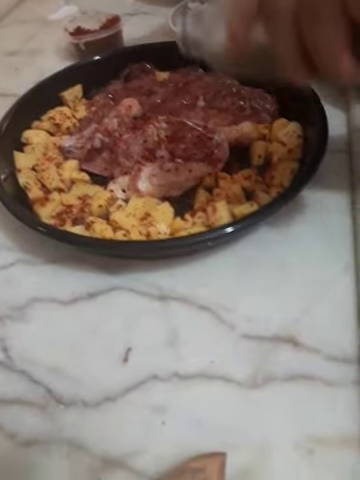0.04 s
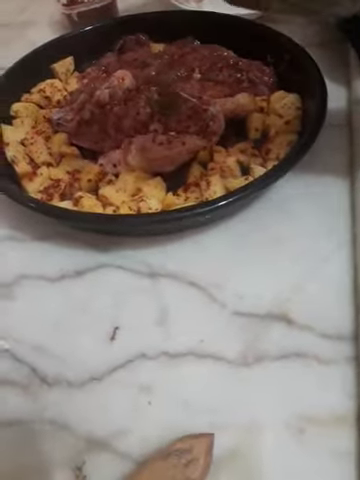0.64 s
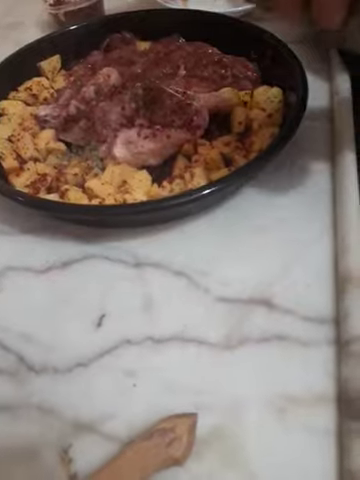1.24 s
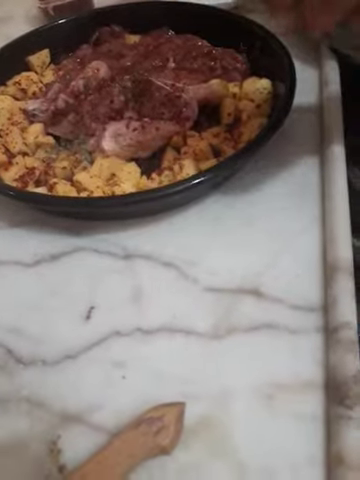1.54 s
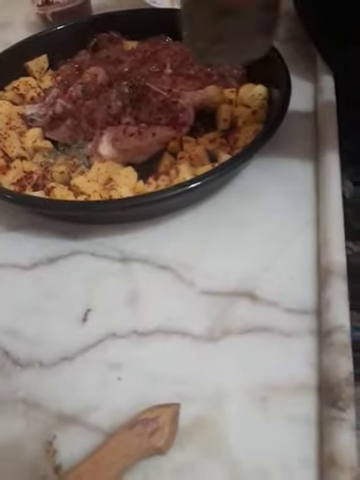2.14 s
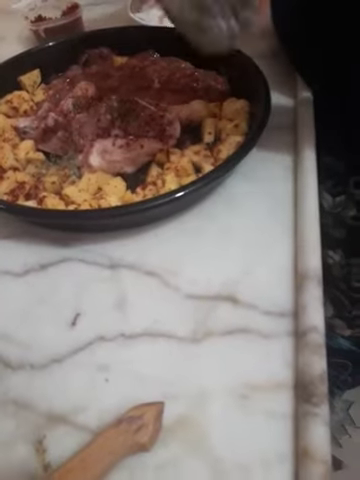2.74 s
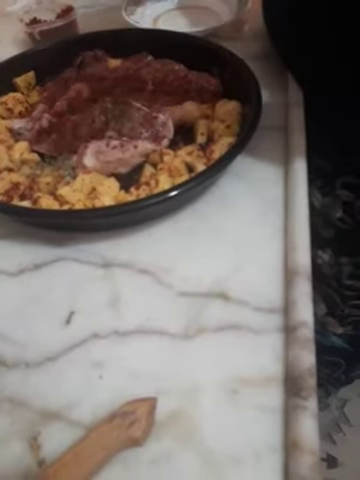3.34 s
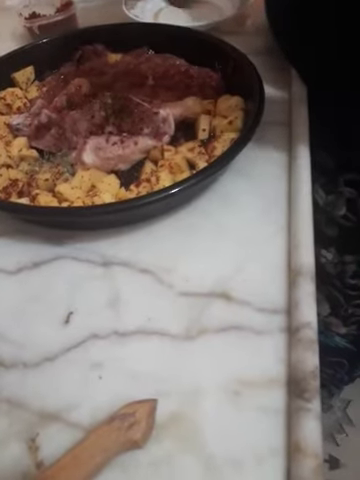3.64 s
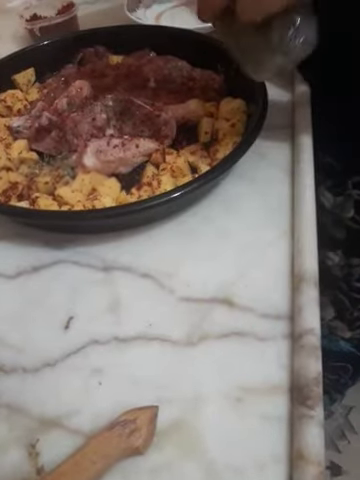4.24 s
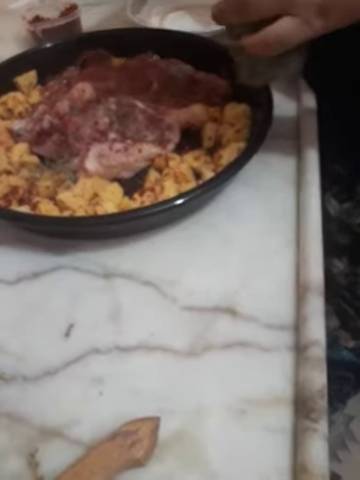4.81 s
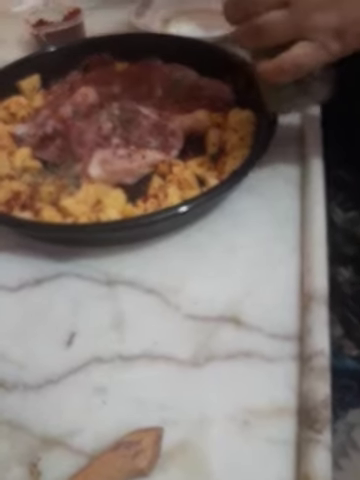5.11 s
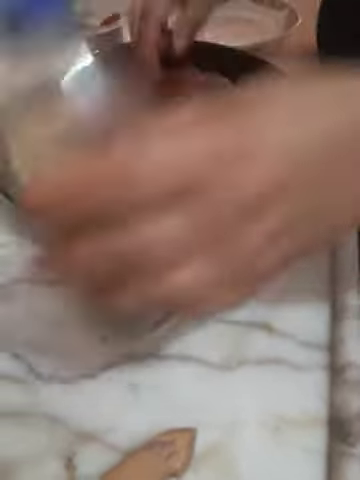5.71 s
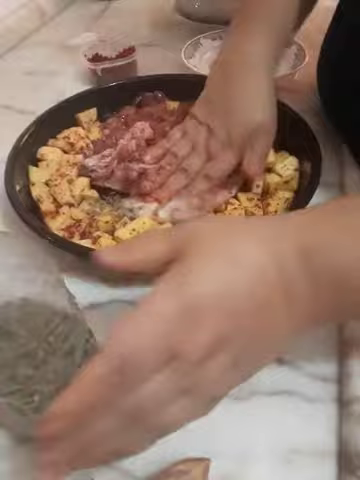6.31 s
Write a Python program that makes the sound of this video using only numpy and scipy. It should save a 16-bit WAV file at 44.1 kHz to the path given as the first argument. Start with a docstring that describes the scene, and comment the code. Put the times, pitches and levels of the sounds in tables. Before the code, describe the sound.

A small jar of dried herbs is shaken in uneven strokes, clicked shut and set down sharply on marble, over a faint fan hum.

```python
"""Dried herbs are shaken from a small jar over meat and potatoes, in a hard-walled kitchen.
For 4 s flakes rustle and hiss with each stroke and hard bits tick on the jar; a short pour follows.
From 4.7 s jar and lid click shut, then clatter on the marble top; the kitchen rings on faintly.
From 5.7 s an arm sweeps past the microphone; its draught buffets the port while a hand rubs the meat.
An appliance fan hums throughout."""
import sys
import numpy as np
from scipy import signal
from scipy.fft import rfft, irfft, next_fast_len
from scipy.io import wavfile
from scipy.ndimage import map_coordinates

SR = 44100
rng = np.random.default_rng(int(sys.argv[2]) if len(sys.argv) > 2 else 0)


def store_pcm(level_fs):
    """Save levels as 16-bit WAV."""
    pcm = np.round(np.clip(level_fs, -1, 1) * 32767).astype(np.int16)
    wavfile.write(sys.argv[1], SR, np.atleast_2d(pcm).T)


N = 284886

# jar strokes: (peak time [s], level [dB])
SHAKES = [(0.023, -37), (0.172, -35.5), (0.305, -40.5), (0.63, -58.5), (0.741, -49.5), (0.874, -47),
          (1.345, -49.5), (1.61, -49), (1.68, -39), (1.795, -39.5), (1.841, -29), (2.04, -59.5),
          (2.265, -56), (2.515, -43.5), (2.62, -46.5), (2.683, -36.5), (2.84, -49), (2.95, -49),
          (3.092, -48.5), (3.24, -39.5), (3.436, -44), (3.578, -49.5), (3.92, -42.5), (3.969, -30.5)]
# coarse flakes in the cavity: (frequency [Hz], level [dB])
RUSTLE_SPECTRUM = [(200, -24), (450, -13.5), (900, -11.5), (1650, -7.5), (2050, 2.5), (2450, 0.5),
                   (2850, -3), (3700, -1.5), (4600, -4.5), (6000, -13.5), (9000, -31)]
# fine flakes: (frequency [Hz], level [dB])
HISS_SPECTRUM = [(2500, -26), (4500, -8), (5900, 0.5), (7200, -4), (8100, -6.5), (8900, 0), (9700, -5.5),
                 (11500, -5.5), (13500, -11), (16000, -11.5)]

def shakes():
    """Strokes throw flakes along the jar, hard ones faster; coarse flakes rustle, fine ones hiss."""
    mid_db, halving_db = -40.5, 23.5  # stroke time halves per halving_db above mid_db
    mid_attack_s, mid_hold_s, mid_release_s = 0.059, 0.017, 0.06
    power = np.zeros(N)
    for peak_s, db in SHAKES:
        stretch = 2 ** ((mid_db - db) / halving_db)
        hold_s = mid_hold_s * stretch
        stroke = [(peak_s - hold_s / 2, hold_s, db)]
        power += envelope(stroke, mid_attack_s * stretch, mid_release_s * stretch) ** 2
    rustle = coloured(grains(rate_hz=5100, spread_db=3), RUSTLE_SPECTRUM)
    hiss = coloured(grains(rate_hz=15000, spread_db=1.5), HISS_SPECTRUM)
    flakes = unit_rms(clumps() * (rustle + amp(-3.5) * hiss))
    return in_kitchen(np.sqrt(power) * flakes, wet_db=-8)


def clumps(spread_db=2, rate_hz=140):
    """Fast random gain: flakes tumble in clumps."""
    knots = rng.standard_normal(N)
    return amp(spread_db * map_coordinates(knots, [np.arange(N) * rate_hz / SR], order=1))


# steady slides: (start [s], length [s], relative level [dB])
POURS = [(4.28, .17, -49), (4.335, 0.073, -44.5), (4.465, 0.14, -39)]
# flakes at the jar's mouth: (frequency [Hz], level [dB])
MOUTH_SPECTRUM = [(200, -16), (900, -11), (1500, -9), (2140, -1.5), (2720, -8), (4080, -0.5), (4780, -7.5),
                  (6240, -7), (7760, -11), (11800, -12), (16000, -20)]

def pour():
    """Flakes trickle over the tilted rim in a gritty stream."""
    stream = unit_rms(clumps() * coloured(grains(rate_hz=5000, spread_db=1), MOUTH_SPECTRUM))
    gain = amp(-2) * envelope(POURS, attack_s=0.048, release_s=0.079)
    return in_kitchen(gain * stream, wet_db=-6)


# hard bits: (time [s], level [dB], pitch [Hz], ring t60 [s])
TICKS = [(.745, -45, 3670, 0.073), (.868, -36.5, 3680, 0.029), (.891, -50, 3680, 0.048),
         (1.237, -42, 4320, .008), (1.818, -30, 3720, 0.015), (2.521, -35, 4140, 0.026),
         (2.574, -38.5, 4360, 0.018), (3.955, -31, 2950, .012), (3.975, -30, 3200, .028),
         (4.272, -50, 6110, .04), (4.335, -35, 3940, .045), (4.574, -38, 3660, 0.036)]

def ticks(snap_t60_s=0.014):
    """Hard bits strike the jar wall: a bright snap and one brief mode each."""
    t = np.arange(SR // 5) / SR
    out = np.zeros(N + SR)
    for time_s, db, hz, t60_s in TICKS:
        snap = coloured(rng.standard_normal(len(t)), HISS_SPECTRUM) * amp(-1.5 - 60 * t / snap_t60_s)
        ring = np.sin(2 * np.pi * hz * t) * amp(3 - 60 * t / t60_s)
        add(out, time_s, amp(db) * (snap + ring))
    return in_kitchen(out[:N], wet_db=-7)


# jar, lid and counter: (time [s], level [dB], cut-off [Hz], bass gain [dB], loss per rebound [dB])
KNOCKS = [(4.71, -37, 6700, 3, 25), (4.905, -38, 9100, 4, 2), (4.9112, -32, 6800, 14, 11),
          (5.0204, -28, 3800, 1.5, 23), (5.098, -11, 10600, -5, 2.5), (5.479, -22, 4000, -5, 8),
          (5.5456, -20, 5500, -15, 2.5), (5.5717, -16.5, 2560, 2.5, 14), (5.611, -28, 3480, 16, 15),
          (5.620, -18, 6260, 3.5, 6), (5.629, -20.5, 3750, 0, 25), (5.8809, -29.5, 8500, 3, 18)]

def jar_knocks(blows=3, rebound_s=0.003, cutoff_ratio=0.61, wet_db=-3, echoes=3):
    """Lid and jar click, then clatter on marble; rebounds are weaker and duller; the room answers."""
    out = np.zeros(N + SR)
    for time_s, db, cutoff_hz, bass_db, loss_db in KNOCKS:
        add(out, time_s, amp(db) * room_ring(cutoff_hz))
        for k in range(blows):
            blow_s = time_s + k * rebound_s
            gain = amp(db - k * loss_db)
            top_hz = cutoff_hz * cutoff_ratio ** k
            walls = sum(reverb(jar_blow(top_hz, bass_db)) for _ in range(echoes)) / np.sqrt(echoes)
            add(out, blow_s, gain * jar_blow(top_hz, bass_db))
            add(out, blow_s, gain * amp(wet_db) * walls)
    return out[:N]


# jar and lid: (frequency [Hz], level [dB], t60 [s])
JAR_MODES = [(456, -13, 0.11), (800, -11.5, 0.049), (1128, -2.5, 0.057), (1310, -14, 0.0286),
             (1500, -9, 0.032), (1550, -6, 0.013), (2110, -0.5, 0.069), (2400, 1, 0.018), (3050, 1, 0.024),
             (3790, -2, 0.038), (4720, -0.5, 0.022), (5200, -7, 0.023), (7400, -21, 0.013),
             (8400, -8, 0.011), (10200, -3, 0.01)]
# contact noise: (frequency [Hz], level [dB])
CRACK_SPECTRUM = [(50, -50), (140, -34), (280, -18), (480, -1.5), (750, -5), (1200, -2), (2200, 3),
                  (2900, -6.5), (4200, -0.5), (5200, -6.5), (6500, -7), (8600, -8.5), (11000, -9),
                  (16000, -20)]

def jar_blow(cutoff_hz, bass_db, crack_t60_s=0.025, rise_s=0.0002):
    """A short crack plus damped modes; a soft touch loses treble, a heavy one gains bass."""
    def touch(hz):
        lowpass = 1 / (1 + (hz / cutoff_hz) ** 8)
        treble_floor = min(cutoff_hz / 15000, 1) ** 2
        bass_shelf = amp(bass_db / (1 + (hz / 1100) ** 2))
        return np.hypot(lowpass, treble_floor) * bass_shelf

    t = np.arange(SR // 16) / SR
    ring = np.zeros(len(t))
    for hz, db, t60_s in JAR_MODES:
        pitch_hz = hz * rng.normal(1, 0.013)  # grip detunes each blow
        decay = amp(db + rng.normal(0, 1.46) - 60 * t / t60_s)
        ring += touch(hz) * decay * np.sin(2 * np.pi * (pitch_hz * t + rng.random()))
    noise = coloured(rng.standard_normal(len(t)), CRACK_SPECTRUM)
    crack = filtered(noise, touch) * amp(-60 * t / crack_t60_s)
    blow = (amp(-12.5) * ring + crack) * (1 - np.exp(-t / rise_s))
    highpass = signal.butter(2, 200, 'high', fs=SR, output='sos')  # a small jar radiates no deep bass
    blow = signal.sosfilt(highpass, blow)
    return blow / np.sqrt(np.mean(blow[:SR // 250] ** 2))  # rms 1 over the first 4 ms


# kitchen resonances: (frequency [Hz], level [dB], t60 [s])
ROOM_MODES = [(1100, -27.5, 0.47), (1484, -25, 0.17), (3800, -27, 0.23)]

def room_ring(cutoff_hz, rise_s=0.0058):
    """Faint kitchen resonances ring on after a knock; a soft one barely excites the high modes."""
    t = np.arange(SR // 3) / SR
    ring = np.zeros(len(t))
    for hz, db, t60_s in ROOM_MODES:
        decay = amp(db - 60 * t / t60_s) / (1 + (hz / cutoff_hz) ** 8)
        ring += decay * np.sin(2 * np.pi * (hz * t + rng.random()))
    return ring * (1 - np.exp(-t / rise_s))


# hand strokes: (start [s], length [s], level [dB])
RUBS = [(5.89, 0.086, -51), (6.17, 0.011, -53.5), (6.35, 0.028, -53)]
# skin friction: (frequency [Hz], level [dB])
SKIN_SPECTRUM = [(500, -1), (1500, 1.5), (2300, -4), (3000, -9), (3900, -5), (4700, -9), (8000, -14.5),
                 (9000, -12.5), (16000, -18.5)]

def hand_rub():
    """Skin slides over jar and meat with soft, grainy friction."""
    friction = coloured(grains(rate_hz=3300, spread_db=1), SKIN_SPECTRUM)
    return in_kitchen(envelope(RUBS, attack_s=0.036, release_s=0.22) * friction, wet_db=-8)


# gusts from the arm: (start [s], length [s], level [dB])
GUSTS = [(4.615, 0.017, -57), (5.66, 0.076, -50), (5.925, 0.058, -34), (6.07, 0.12, -39),
         (6.365, 0.047, -46.5)]
# air at the port: (frequency [Hz], level [dB])
BUFFET_SPECTRUM = [(20, -26), (45, -8), (70, -2), (130, -3.5), (190, -10.5), (280, -19), (500, -50.5),
                   (1500, -88)]

def arm_draught():
    """The passing arm pushes air into the microphone port: low, dry rumbles."""
    buffet = coloured(rng.standard_normal(N), BUFFET_SPECTRUM)
    return envelope(GUSTS, attack_s=0.047, release_s=0.025) * buffet


# air rush: (frequency [Hz], relative density [dB])
AIR_SPECTRUM = [(25, -40), (50, -7.5), (75, -8), (130, -4), (230, -3), (400, -3.5), (700, -6.5), (1200, -6),
                (1700, -7), (2300, -6.5), (2700, -13), (4000, -15), (7500, -27), (16000, -30)]
# peaks in the rush: (centre [Hz], width [Hz], level [dB])
FAN_RESONANCES = [(153.7, 15, -68.5), (329.6, 40, -61), (589, 25, -69.5), (683, 12, -70.5), (813, 9.3, -69),
                  (2020, 340, -65), (8700, 720, -77.5)]
# motor: (frequency [Hz], level [dB])
MOTOR_TONES = [(100, -69.5), (592, -63.5)]

def fan():
    """Steady air rush with narrow resonances, over faint motor tones."""
    t = np.arange(N) / SR
    rush = amp(-51.5) * coloured(rng.standard_normal(N), AIR_SPECTRUM)
    hum = np.zeros(N)
    for centre_hz, width_hz, db in FAN_RESONANCES:
        resonance = lambda hz: 1 / (1 + (2 * (hz - centre_hz) / width_hz) ** 2)
        hum += amp(db) * unit_rms(filtered(rng.standard_normal(N), resonance))
    motor = sum(amp(db) * np.sqrt(2) * np.sin(2 * np.pi * hz * t) for hz, db in MOTOR_TONES)
    return rush + hum + motor


# kitchen decay: (frequency [Hz], t60 [s])
KITCHEN_T60 = [(200, 0.49), (530, 0.38), (1400, 0.41), (3700, 0.28), (9700, 0.33), (16000, 0.43)]

def reverb(x, build_s=0.0023):
    """Wall reflections only: fast build-up, then a separate decay in each band."""
    hz, t, bands = signal.stft(rng.standard_normal(SR // 3), SR, nperseg=256)
    decay = amp(-60 * t / log_interp(KITCHEN_T60, hz)[:, None])
    tail = signal.istft(bands * decay, SR, nperseg=256)[1]
    tail *= 1 - np.exp(-np.arange(len(tail)) / SR / build_s)
    return signal.fftconvolve(x, tail / np.linalg.norm(tail))


def in_kitchen(x, wet_db):
    """Direct sound plus reflections."""
    return x + amp(wet_db) * reverb(x)[:N]


def grains(rate_hz, spread_db):
    """Tiny impacts, random in time and size."""
    sizes = rng.uniform(-1.18, 1, N) * amp(spread_db * np.minimum(rng.exponential(size=N), 4))
    return sizes * (rng.random(N) < rate_hz / SR)


def envelope(rows, attack_s, release_s):
    """Each row rises, holds and falls; attack and release times are per 20 dB."""
    t = np.arange(N) / SR
    power = np.zeros(N)
    for start_s, length_s, db in rows:
        before = (start_s - t) / attack_s
        after = (t - start_s - length_s) / release_s
        power += amp(db - 20 * np.maximum(np.maximum(before, after), 0)) ** 2
    return np.sqrt(power)


def coloured(x, spectrum):
    """x shaped by a spectrum table, at rms 1."""
    return unit_rms(filtered(x, lambda hz: amp(log_interp(spectrum, hz))))


def filtered(x, response):
    """Zero-phase filter with gain response(hz)."""
    size = next_fast_len(len(x) + 8192)
    return irfft(rfft(x, size) * response(np.fft.rfftfreq(size, 1 / SR)), size)[:len(x)]


def log_interp(points, hz):
    knots_hz, values = np.transpose(points)
    return np.interp(np.log(hz + 1), np.log(knots_hz + 1), values)


def amp(db):
    return 10 ** (np.asarray(db) / 20)


def unit_rms(x):
    return x / np.sqrt(np.mean(x ** 2) + 1e-20)


def add(out, time_s, sound):
    out[round(time_s * SR):][:len(sound)] += sound


def scene():
    return (shakes() + pour() + ticks() + jar_knocks() + hand_rub() + arm_draught() + fan())[None]


def record(dry):
    """The microphone rounds off the highest peaks and cuts everything above its band."""
    ceiling, top_hz = 0.9, 15900
    limited = dry[0] / (1 + np.abs(dry[0] / ceiling) ** 6) ** (1 / 6)
    return filtered(limited, lambda hz: 1 / (1 + (hz / top_hz) ** 200))[None]


dry = scene()
out = record(dry)
store_pcm(out)
```